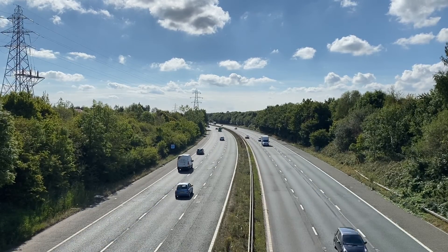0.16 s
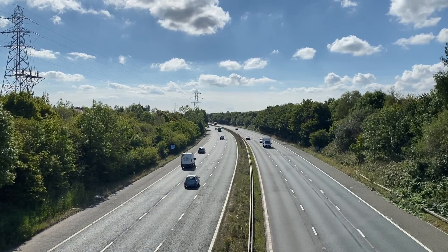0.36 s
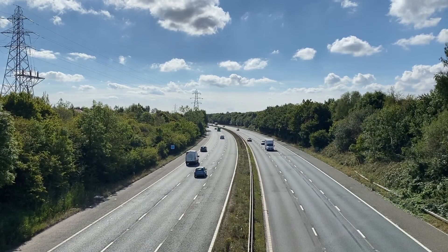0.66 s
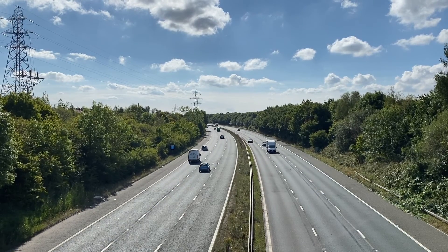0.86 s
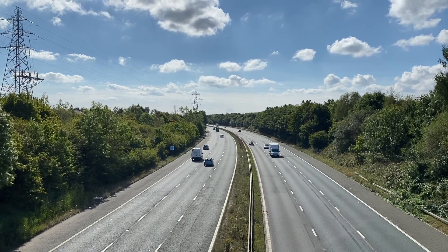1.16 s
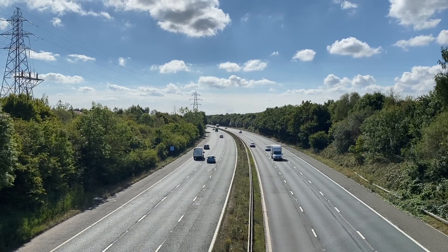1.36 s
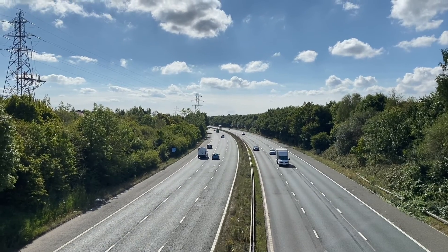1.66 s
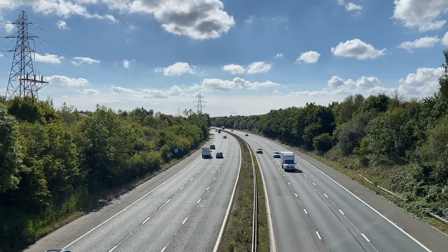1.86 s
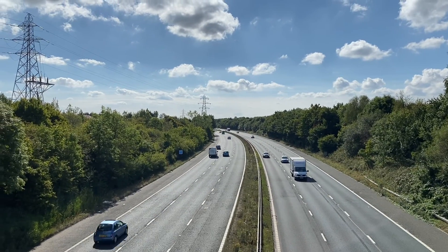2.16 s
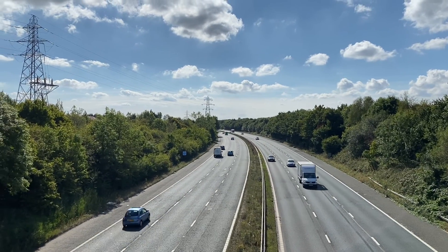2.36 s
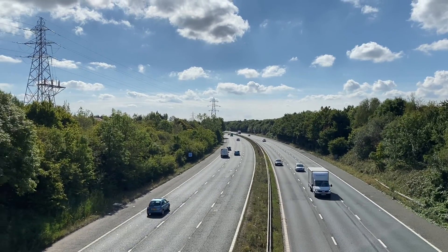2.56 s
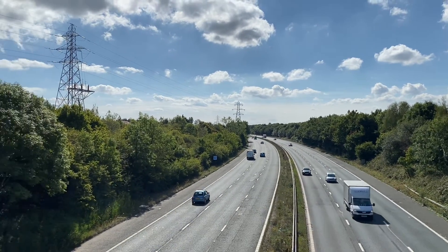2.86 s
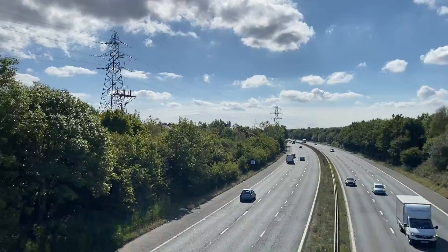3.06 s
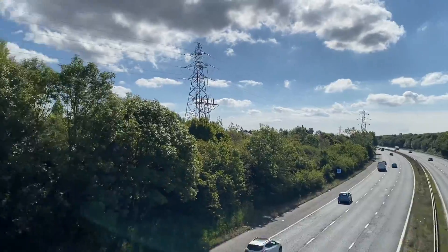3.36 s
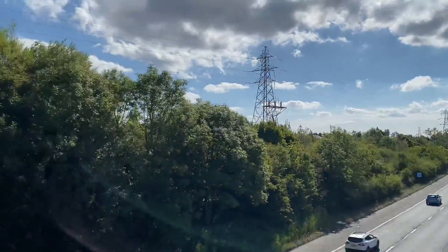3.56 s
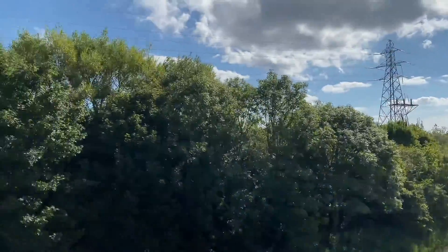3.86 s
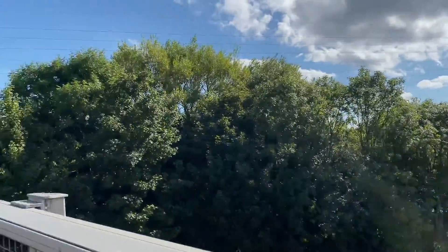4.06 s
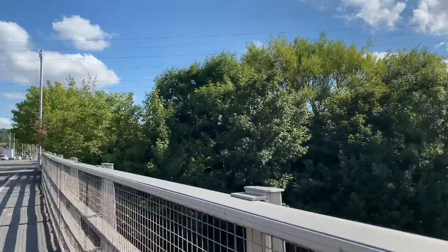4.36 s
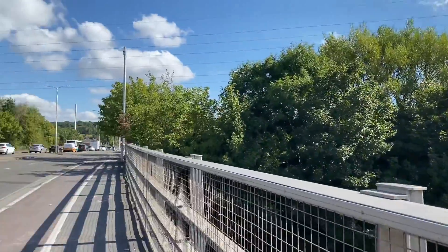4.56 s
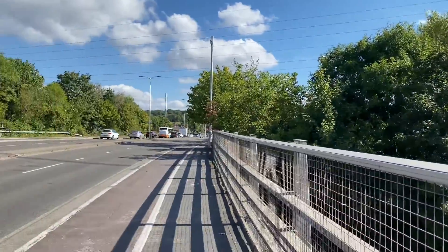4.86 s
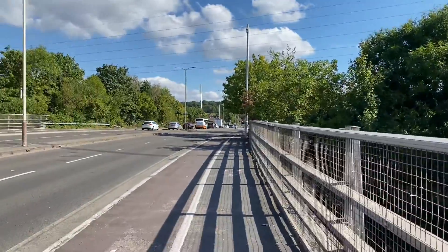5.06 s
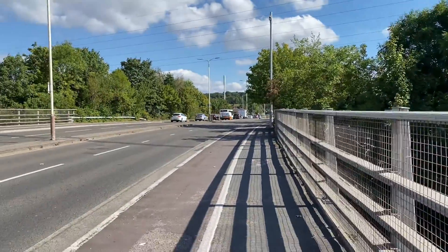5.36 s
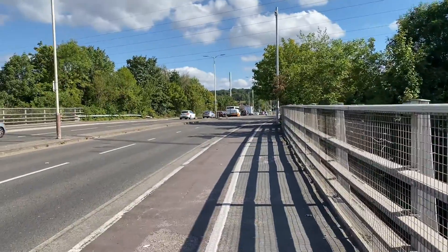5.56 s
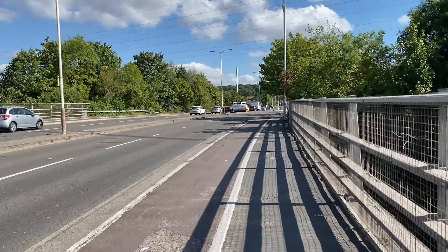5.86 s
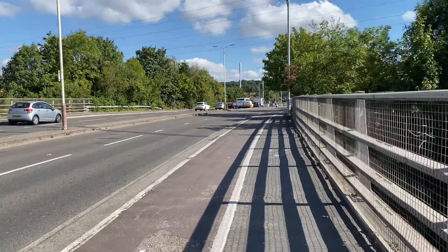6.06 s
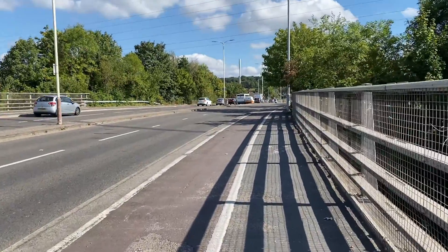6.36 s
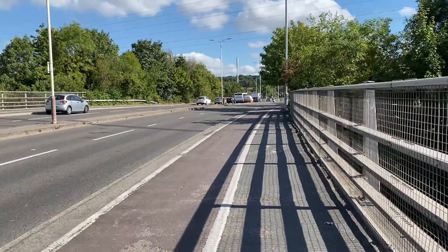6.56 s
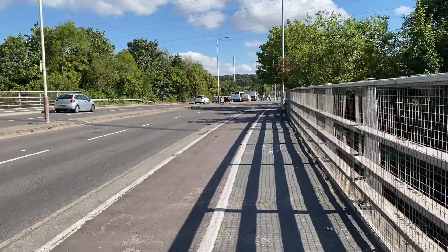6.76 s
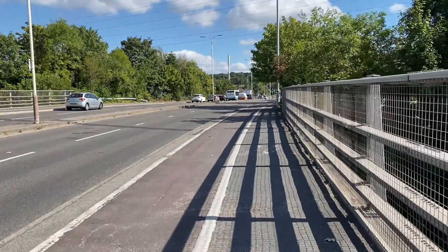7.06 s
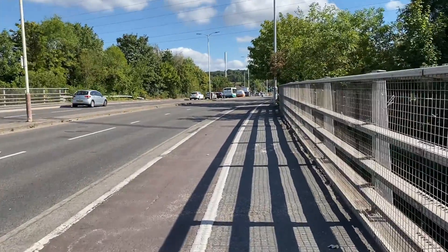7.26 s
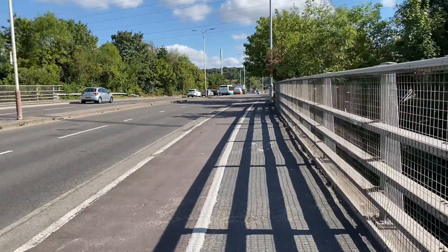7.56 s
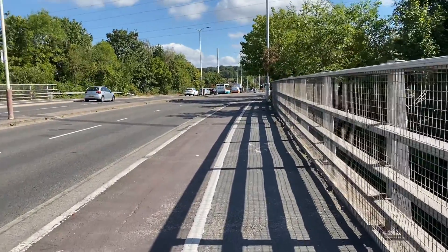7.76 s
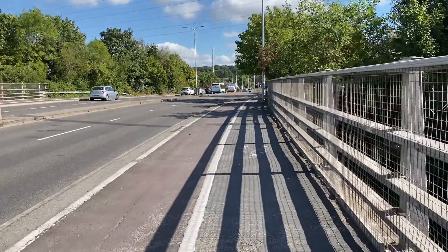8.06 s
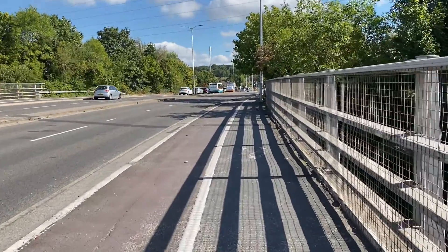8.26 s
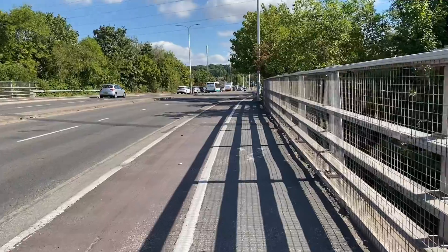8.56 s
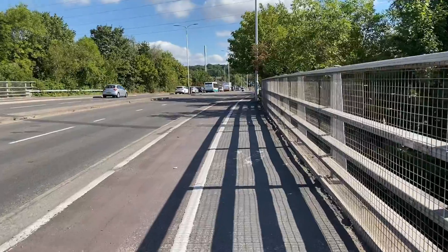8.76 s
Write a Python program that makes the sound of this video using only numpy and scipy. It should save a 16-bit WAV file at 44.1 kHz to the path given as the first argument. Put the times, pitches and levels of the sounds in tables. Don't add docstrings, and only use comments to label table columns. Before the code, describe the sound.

Dense motorway traffic roars beneath a bridge, cars swelling and fading with tyre hiss, low thumps and air bursts, then growing duller as the microphone turns.

```python
import sys
import numpy as np
from scipy import signal
from scipy.fft import rfft, irfft, next_fast_len
from scipy.io import wavfile
from scipy.ndimage import uniform_filter1d

SR = 44100
rng = np.random.default_rng(int(sys.argv[2]) if len(sys.argv) > 2 else 0)


def decibels_to_gain(level_db):
    exponent = np.asarray(level_db, float) / 20
    return 10 ** exponent


def persist_wave(psi):
    counts = np.round(np.clip(psi, -1, 1) * 32767).astype(np.int16)
    wavfile.write(sys.argv[1], SR, np.atleast_2d(counts).T)


N = 393810
STEP, RUN_IN = 32, 8192
CONTROL_S = np.arange(0, N, STEP) / SR
SIDES = np.array([[.5], [-.5]])
FALLOFF = 1.49
TOP_FROM_HZ, GRAINY_FROM_HZ = 6800, 1500


def rms_one(x):
    return x / np.sqrt(np.mean(x ** 2) + 1e-20)


def noise_band(order, low_hz, high_hz):
    band = signal.butter(order, [low_hz, high_hz], "band", fs=SR, output="sos")
    return rms_one(signal.sosfilt(band, rng.standard_normal(N)))


def in_time(rows):
    s, *columns = np.transpose(rows)
    return [np.interp(CONTROL_S, s, c) for c in columns]


def per_sample(control):
    return np.repeat(control, STEP, axis=-1)[..., :N]


def density(points, hz):
    f, level_db = np.transpose(points)
    grid = np.geomspace(f[0], f[-1], 200)
    total = np.sum(decibels_to_gain(2 * np.interp(np.log(grid), np.log(f), level_db)) * np.gradient(grid))
    return decibels_to_gain(2 * np.interp(np.log(hz), np.log(f), level_db, left=-90, right=-90)) / total


def drift(rate):
    r = np.exp(-2 * np.pi * rate * STEP / SR)
    chance = rng.standard_normal(-(-N // STEP) + 4000)
    return rms_one(signal.lfilter([1], [1, -2 * r, r * r], chance)[4000:])


def dying(s, t60, rise, held=0):
    age = np.maximum(CONTROL_S - s, 0)
    return (1 - np.exp(-age / rise)) * decibels_to_gain(-60 * np.maximum(age - held, 0) / t60)


def passing(s, length, edge=2):
    return (1 + np.abs((CONTROL_S - s) / length) ** edge) ** -FALLOFF


def added_db(far_db, rows, column):
    near = sum(decibels_to_gain(2 * row[column]) * passing(*row[:2]) for row in rows)
    return 10 * np.log10(decibels_to_gain(2 * far_db) + near)


def late(x, ms):
    return np.interp(np.arange(N) - ms * SR / 1000, np.arange(N), x)


# start_s, heading (-1 ahead left .. +1 right)
HEADING = [(0, 0.034), (.95, -0.095), (1.35, -0.99), (1.6, -0.58), (2.0, -0.58), (2.9, -0.67), (3.3, -0.16),
           (3.9, 0.27), (4.5, 0.76), (6.5, 0.7), (6.9, 0.61), (7.3, 0.7), (8.93, 0.85)]
# loudest_s, passing_s, level_db, centre_hz, left_over_right_db
TYRES = [(0, 0.11, -30, 940, 9.5), (.4, 0.29, -20, 1056, 3), (.88, 0.18, -25.5, 830, -1),
         (1.33, 0.2, -25, 890, 3.5), (1.95, 0.33, -26, 1030, 4.5), (2.55, 0.27, -21.5, 920, 3.5),
         (2.85, 0.24, -23, 977, 4.5), (3.28, 0.26, -24.5, 980, 6), (3.6, 0.13, -26, 860, 5.5),
         (4.0, 0.28, -20, 994, -2), (4.52, 0.28, -27, 1093, -9.5), (4.9, 0.33, -25.5, 1080, -6.5),
         (5.4, 0.078, -25.5, 1073, -2.5), (6.15, 0.42, -31, 980, -2), (6.649, 0.77, -37.5, 980, 1),
         (7.3, 0.25, -25.5, 1067, -4.5), (7.72, 0.68, -28, 953, -7.5), (8.45, 0.29, -26.5, 1064, -6),
         (8.8, 0.22, -27.5, 980, -8.5)]


def tyres():
    heading, = in_time(HEADING)
    power = decibels_to_gain(2 * (-34.5 - 9.5 * heading * SIDES))
    weighted = power * 980
    for s, length, db, hz, pan in TYRES:
        near = decibels_to_gain(2 * (db + pan * SIDES)) * passing(s, length)
        climb_hz = 38 * np.clip(CONTROL_S - s, -1, 1)
        power = power + near
        weighted = weighted + near * (hz + climb_hz)
    return 10 * np.log10(power), weighted / power


# pitch_hz, level_db (per Hz)
ROAR = [(350, -20.5), (520, -11.5), (700, -2), (850, 1), (1000, -0.5), (1200, -3), (1450, -8.5),
        (1900, -26.5)]


def tyre_roar(roar_db, centre_hz):
    shift = (980 / centre_hz) ** 1.48
    return lambda hz: decibels_to_gain(2 * roar_db) * shift * density(ROAR, hz * shift)


# pitch_hz, level_db (per Hz)
RIDGE = [(700, -24), (860, 2.5), (1000, 5.5), (1160, 2.5), (1400, -43)]
# middle_s, half_length_s, pitch_hz, rise_hz_per_s, level_db
DRAWING_AWAY = [(3.9, 0.31, 890, 450, -24.5), (3.148, 0.41, 1520, 100, -37), (5.055, 0.44, 1060, 243, -24),
                (5.9, 0.25, 1510, 101, -33.5), (7.1, 0.2, 970, 700, -25), (7.65, 0.29, 1100, 199, -23.5),
                (8.5, 0.31, 1060, 60, -44), (7.75, .18, 1230, 100, -30), (1.63, .3, 1000, 100, -32.5)]


def road_echo(hz):
    if hz > 2600:
        return 0
    power = 0
    for s, half, middle_hz, rise, db in DRAWING_AWAY:
        ridge_hz = np.maximum(middle_hz + rise * (CONTROL_S - s), 200)
        power = power + density(RIDGE, hz * 1000 / ridge_hz) * decibels_to_gain(2 * db) * passing(s, half, edge=4.8)
    return power * decibels_to_gain([[2 * -12], [0]])


# pitch_hz, level_db (per Hz)
RUMBLE = [(20, -10), (33, -32), (50, -1), (80, 2.5), (120, -3), (200, -10.5), (400, -24.5)]
DRONE = [(70, -20), (140, -6), (250, -2.5), (400, -7), (550, -4.5), (800, -19.5)]
# loudest_s, passing_s, rumble_db, drone_db
ENGINES = [(0, 0.22, -32, -32.5), (.42, 0.078, -31, -28.5), (.66, 0.21, -33.5, -27),
           (1.35, 0.38, -36.5, -35), (2.2, 1, -44, -32.5), (2.9, 0.15, -34.5, -31.5), (3.4, 0.36, -41, -31),
           (3.95, 0.38, -27.5, -24.5), (4.35, 0.25, -30.5, -45), (5.05, 0.24, -35.5, -48),
           (5.45, 0.18, -36, -40.5), (6.2, 0.12, -34.5, -47), (6.9, 0.25, -48.5, -35.5),
           (7.35, 0.34, -33, -35), (8.42, 0.22, -33.5, -40.5)]


def engines(shade_db):
    rumble_db = added_db(-37, ENGINES, column=2) + 2.0
    drone_db = added_db(-35.5 + 0.35 * shade_db, ENGINES, column=3)
    return lambda hz: density(RUMBLE, hz) * decibels_to_gain(2 * rumble_db) + density(DRONE, hz) * decibels_to_gain(2 * drone_db)


# pitch_hz, level_db (per Hz)
HISS = [(1800, -22), (2600, 4), (3500, 1), (5000, -4.5), (6500, -8), (8000, -39.5), (11000, -40)]
SWIRL = [(4000, -8), (7000, 0), (8400, 5.5), (10000, -0.5), (11500, -10), (13000, -15), (15000, -3.5),
         (18500, -9)]
# loudest_s, passing_s, hiss_db, swirl_db
NEAREST = [(.0, 0.063, -49, -57), (.33, 0.12, -43.5, -51.5), (.5, .07, -43.5, -48.5), (.7, 0.048, -48, -63),
           (1.3, 0.35, -58, -62.5), (2.1, 0.081, -46.5, -70), (3.2, 0.25, -48, -75),
           (3.68, 0.079, -52, -55.5), (3.95, 0.14, -44.5, -59), (4.3, 0.062, -54, -73),
           (4.9, 0.09, -48, -64.5), (5.6, 0.09, -56, -85), (6.79, 0.014, -46.5, -73), (7.1, 0.34, -55, -66),
           (7.88, 0.33, -51.5, -79), (8.9, 0.49, -55, -74)]


def nearest_vehicles(shade_db):
    hiss_db = added_db(-48 + shade_db, NEAREST, column=2)
    air_db = added_db(-63.5 + 2 * shade_db, NEAREST, column=3)
    bright_db = -11.5 + 0.24 * (air_db - hiss_db + 12) + 3 * drift(11)

    def power(hz):
        tilt_db = 0.6 * (bright_db + 8.0) * np.log2(hz / 4000)
        hiss = density(HISS, hz) * decibels_to_gain(2 * (hiss_db + 2.5 + tilt_db))
        return hiss + density(SWIRL, hz) * decibels_to_gain(2 * (air_db + 3.5))
    return power


# pitch_hz, level_db (per Hz)
BURST = [(1200, -9), (2200, 6), (3000, 7.5), (4500, -4.5), (6000, -6.5), (8000, -3.5), (11000, -14),
         (18000, -18)]
# start_s, peak_db, held_s, decay_t60_s
BURSTS = [
    (0.6544, -24.5, 0.046, 0.8),
    (1.9305, -22.5, 0.09, 0.6),
    (2.9025, -23, 0.05, 0.45),
    (2.4174, -31, 0.005, 0.06),
]


def air_bursts():
    gain = sum(decibels_to_gain(db - 13.5) * dying(s, t60, rise=0.00098, held=held) for s, db, held, t60 in BURSTS)
    return lambda hz: density(BURST, hz) * gain ** 2


# pitch_hz, level_db (per Hz)
SHELF = [(1000, -18), (1400, 3), (1700, -5.5), (2000, 0.5), (2500, -13.5), (3200, -21.5)]
SHELF_DB = [
    [-32],
    [-31.5],
]


def roar_shoulder(roar_db, shade_db):
    shelf_db = SHELF_DB + 0.23 * (roar_db + 22.0) + 0.93 * shade_db
    return lambda hz: density(SHELF, hz) * decibels_to_gain(2 * (shelf_db - 0.5))


# start_s, level_db
SHADE = [(0, 1.5), (1, -1.5), (2.5, 1), (4.1, -1.5), (4.5, -2.5), (5.4, -4), (6.4, -6.5), (7.5, -10),
         (8.93, -11)]


def traffic_power():
    roar_db, centre_hz = tyres()
    shade_db, = in_time(SHADE)
    sources = [tyre_roar(roar_db, centre_hz), road_echo, engines(shade_db), nearest_vehicles(shade_db),
               air_bursts(), roar_shoulder(roar_db, shade_db)]
    return lambda hz: sum(source(hz) for source in sources)


def thinned(x, under, from_hz):
    hz, _, grains = signal.stft(x, SR, nperseg=1024)
    around = np.sqrt(abs(uniform_filter1d(abs(grains) ** 2, size=24, axis=-2)))
    bar = under * np.clip((hz - from_hz) / (TOP_FROM_HZ - from_hz), 0, 1)[:, None] * around
    kept = grains / (1 + (bar / (abs(grains) + 1e-12)) ** 8)
    out = signal.istft(kept, nperseg=1024)[1][..., :N]
    return out * np.std(x) / np.std(out)


def spread(top):
    size = next_fast_len(N)
    hz = np.fft.rfftfreq(size, 1 / SR)
    half = np.pi * (hz - 3150) / 3575
    steer = 1.35 * np.clip(hz / TOP_FROM_HZ - .8, 0, .7)
    total = np.cos(half) * abs(np.cos(half)) ** steer
    apart = -1j * np.sin(half) * abs(np.sin(half)) ** steer
    apart = apart * decibels_to_gain(-3.5 * (hz < 9600))
    return irfft(rfft(top, size) * [total + apart, total - apart], size)[:, :N]


# pitch_hz, direct_share_ahead, direct_share_side_on, lag_ahead_ms, lag_side_on_ms,
# left_over_right_ahead_db, left_over_right_side_on_db
PORTS = [(60, 0.99, 0.78, .3, 0.27, 0, -2.5), (145, 1, 0.71, 0.51, 0.14, -2.5, 0),
         (320, 0.94, 0.6, 0.37, 0.96, -1, -5.5), (626, 0.71, 0.74, 0.39, 0.69, -1.5, -2.5),
         (1100, 0.4, 0.97, 0.42, 0.43, -1.8, 1.3), (1630, 0.25, 1, 0.55, 0.22, -3.5, 6.5),
         (2840, 0.089, 0.45, 0.65, 0.21, 0.5, 2), (4300, 0.46, 0.22, 0.43, 0.31, 2, 1),
         (5760, 0.2, 0.25, 0.34, 0.06, 1, 5.5)]
SCATTER_S = (.031, .047)


def traffic(patchy_db, gust_db):
    power = traffic_power()
    heading, = in_time(HEADING)
    side_on = np.clip(heading, 0, 1)
    white, gusts = rng.standard_normal((2, 3, N)), drift(23)
    white = white[..., np.r_[-RUN_IN:N]]
    out, top = np.zeros((2, N)), np.zeros(N)
    edges = np.r_[22 * 2 ** (np.arange(8) / 2), 350 * 2 ** (np.arange(24) / 4)]
    port_hz, *port_columns = np.transpose(PORTS)
    for k, (low, high) in enumerate(zip(edges, edges[1:])):
        hz = np.sqrt(low * high)
        band = signal.butter(2, [low, high], "band", fs=SR, output="sos")
        flicker_db = patchy_db * (drift(7.3) + 0.35 * (1500 < hz < 4500) * drift(2.1))
        flicker_db = flicker_db + gust_db * gusts * min(hz / 8000, 1)
        gain = np.sqrt(power(hz) * SR / 2) * decibels_to_gain(flicker_db)
        if hz > TOP_FROM_HZ:
            top += per_sample(gain[0]) * signal.sosfilt(band, white[k % 2, 0])[RUN_IN:]
            continue
        direct, *scattered = signal.sosfilt(band, white[k % 2])[:, RUN_IN:]
        at_pitch = [np.interp(np.log(hz), np.log(port_hz), c) for c in port_columns]
        ahead, aside, lag_ahead, lag_aside, lean_ahead, lean_aside = at_pitch
        share = np.clip(ahead + (aside - ahead) * side_on, 0, 1)
        lag = per_sample(heading * np.where(heading > 0, lag_aside, lag_ahead) / 2)
        gain = gain * decibels_to_gain((lean_ahead + (lean_aside - lean_ahead) * side_on) * SIDES)
        arriving = direct if hz < 130 else [late(direct, lag), late(direct, -lag)]
        out += per_sample(gain * np.sqrt(share)) * arriving
        out += per_sample(gain * np.sqrt(1 - share)) * scattered
    below = signal.sosfilt(signal.butter(2, 1.2 * TOP_FROM_HZ, fs=SR, output="sos"), out)
    below = thinned(below, 0.49, GRAINY_FROM_HZ)
    top = thinned(top, 0.9, GRAINY_FROM_HZ)
    returned = decibels_to_gain(-20) * np.array([np.roll(top, int(s * SR)) for s in SCATTER_S])
    return below + spread(top) + returned


# middle_s,
# half_length_s, pitch_hz, rise_hz_per_s, level_db
SONG_LEFT = [(.12, 0.15, 830, 4, -28.5), (0.3, .15, 1150, 100, -34), (1.6, 0.22, 1200, 201, -34.5),
             (2.5, 0.44, 1000, -100, -34), (3.95, 0.18, 1000, 307, -27.5), (3.3, 0.14, 770, 104, -46),
             (5.5, 0.22, 980, 46, -41), (7.7, 0.21, 900, 202, -35), (1.2, 0.34, 860, -1, -40),
             (.3, .3, 2100, 3, -42), (3.2, .05, 4000, 0, -50), (.6, 0.13, 800, 0, -27.5),
             (0.17, .15, 3200, 0, -50), (.15, .15, 5300, 0, -50), (3.3, 0.22, 1400, 2, -34),
             (8.3, 0.22, 1300, 0, -37)]
SONG_RIGHT = [(0.73, 0.09, 780, 50, -32), (2.6, 0.25, 970, -200, -38), (4.1, .12, 850, 3, -30),
              (4.8, 0.31, 1157, 300, -32), (5.35, 0.33, 1140, 204.5, -35), (7, 0.39, 980, -2, -34),
              (7.07, 0.17, 920, 599.5, -27.5), (7.45, 0.22, 1220, 198, -27), (7.8, 0.093, 880, 103, -30),
              (8.5, 0.18, 1020, -7, -38), (7.6, .02, 6000, -2, -55), (7.92, .12, 3800, -2, -56),
              (7.17, .1, 5800, -1, -59), (2.0, 0.054, 3000, 0, -46), (2.94, 0.045, 4600, 0, -52),
              (2.94, 0.036, 6600, 0, -54), (7.19, 0.1, 1000, 502, -26.5), (4.9, 0.13, 1700, -1, -43),
              (5.1, 0.25, 1300, 148.5, -36), (7.85, 0.17, 1200, -5, -34), (3.3, .025, 3600, 0, -47),
              (2.4, .025, 4100, 0, -53), (7.88, 0.11, 2900, 1998, -52), (.95, .15, 890, 102, -31),
              (6.9, 0.055, 790, 300, -31), (6.95, 0.18, 2350, 0, -48.5), (2.55, .25, 880, 1, -33),
              (1.25, 0.22, 930, 0, -36), (8.6, .15, 5500, 0, -61), (4.6, .1, 1900, 0, -48),
              (5.0, 0.11, 2000, 3, -44), (6.95, .2, 1600, 300, -43), (6.8, .3, 1600, 53, -36),
              (4.2, 0.16, 2150, 2, -40.5), (.55, .15, 2150, 2, -40), (2.97, .02, 4000, 0, -44)]


def tread_song():
    out = np.zeros((2, N))
    lean_db = 9.5
    for rows, side in ((SONG_LEFT, 1), (SONG_RIGHT, -1)):
        for s, half, hz, rise, db in rows:
            width_hz = 0.073 * hz
            wander = drift(width_hz) + 1j * drift(width_hz)
            wander = wander * np.sqrt(passing(s, half, edge=6.5))
            heard = np.arange(max(int((s - 3 * half) * SR), 0), min(int((s + 3 * half) * SR), N))
            age = heard / SR - s
            glide = np.exp(2j * np.pi * (hz * age + rise * age ** 2 / 2))
            tone = np.interp(heard / STEP, np.arange(len(wander)), wander) * glide
            port_db = [[db + lean_db * min(side, 0)], [db - lean_db * max(side, 0)]]
            out[:, heard] += decibels_to_gain(port_db) * tone.real
    return out


def ringing(rows, rise, later=0, trim_db=0):
    t = np.arange(N) / SR
    return sum(per_sample(decibels_to_gain(db + trim_db) * dying(s + later, t60, rise)) * np.sin(2 * np.pi * hz * (t - s))
               for s, db, hz, t60 in rows)


# start_s, peak_db, pitch_hz, decay_t60_s
THUMPS = [(0.041, -11.5, 132, 0.055), (.155, -12, 130, .06), (.42, -11, 90, .12), (0.626, -12, 86.4, 0.3),
          (4.524, -4.5, 89, 0.052), (5.434, -16.5, 66, 0.29), (5.995, -17, 120.8, .06),
          (6.22, -22, 72, 0.18), (7.277, -3, 190, 0.052), (7.366, -8.5, 74.6, 0.079),
          (7.47, -11.5, 140, .05), (7.53, -15, 150, .05), (8.41, -11, 126, 0.045)]


def thumps():
    rings = ringing(THUMPS, rise=0.0015, later=0.0092, trim_db=-4.0)
    return signal.sosfilt(signal.butter(4, 600, fs=SR, output="sos"), rings)


# start_s, peak_db, pitch_hz, decay_t60_s
KNOCKS = [
    (0.29, -12, 1330, .03),
    (.385, -11, 1090, .02),
    (7.268, -12, 1050, .03),
    (8.194, -20, 1000, 0.033),
]


def knocks():
    rings = ringing(KNOCKS, rise=0.0006)
    return signal.sosfilt(signal.butter(2, 2500, fs=SR, output="sos"), rings)


# start_s, peak_db, decay_t60_s, highest_treble_db (against the rest)
TICKS = [(.6544, -41, 0.18, -10), (1.9305, -42, 0.1, 0), (1.936, -44, .2, -5), (2.4174, -48, .025, -2),
         (2.9025, -42, 0.1, -6), (4.866, -62, .15, -3), (6.169, -62, .07, 0), (6.784, -60, 0.15, 0),
         (7.274, -62, .05, 0), (7.572, -62, .1, -3), (7.595, -53, 0.12, -3), (7.858, -61, .12, -5),
         (8.59, -55, .06, -2), (8.708, -66, .05, -3)]


def ticks():
    out = 0
    for low_hz, high_hz, is_top in ((5500, 12000, 0), (12000, 16500, 1)):
        rub = noise_band(3, low_hz, high_hz)
        cracks = sum(decibels_to_gain(db + is_top * top_db) * dying(s, t60, rise=.0008) for s, db, t60, top_db in TICKS)
        out = out + spread(rub) * per_sample(cracks)
    return out


# start_s, peak_db
SNAPS = [
    (1.931, -46),
    (2.418, -49),
    (2.903, -44),
    (6.169, -64),
    (6.784, -57),
    (7.2755, -51),
    (8.59, -57),
]


def snaps():
    fizz = noise_band(2, 13500, 15800)
    return fizz * per_sample(sum(decibels_to_gain(db) * dying(s, .012, rise=.0005) for s, db in SNAPS))


def scene():
    road = traffic(patchy_db=1.37, gust_db=1.1) + tread_song() + thumps() + knocks()
    handling = ticks() + snaps()
    limit = signal.ellip(10, .5, 60, 15750, fs=SR, output="sos")
    return signal.sosfilt(limit, road + handling)


def top_cut(x):
    return signal.sosfilt(signal.butter(12, 16060, fs=SR, output="sos"), x)


def record(dry):
    return top_cut(dry)


dry = scene()
out = record(dry)
persist_wave(out)
```